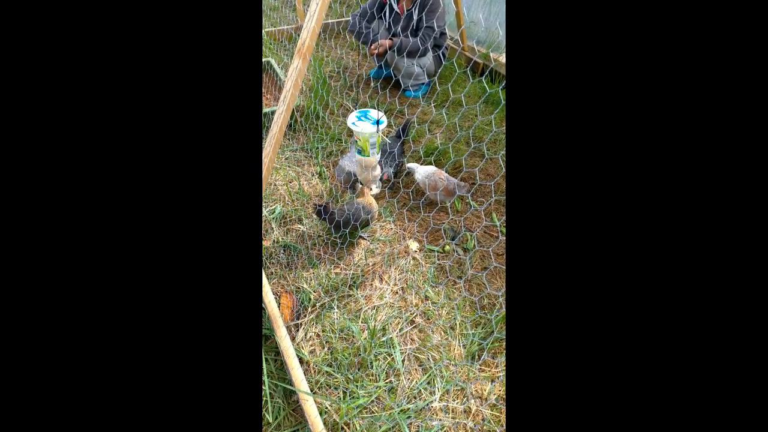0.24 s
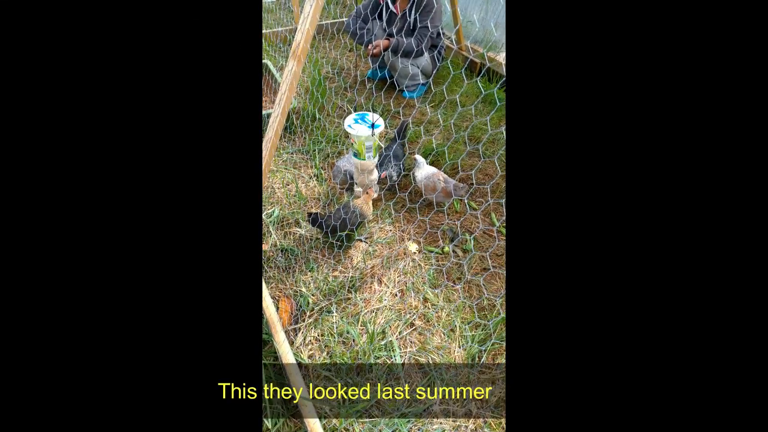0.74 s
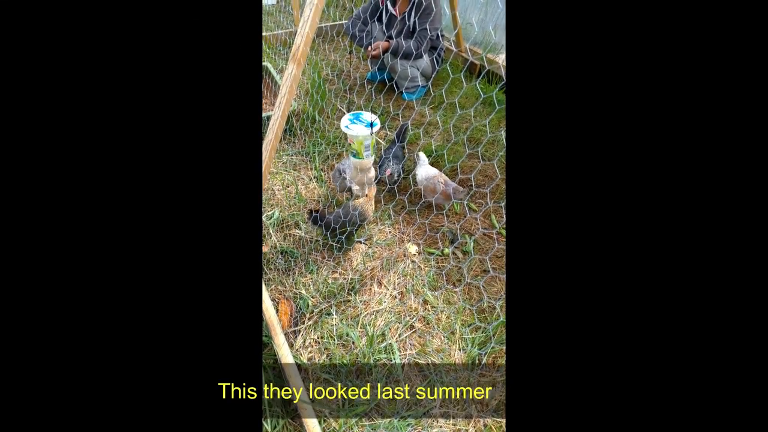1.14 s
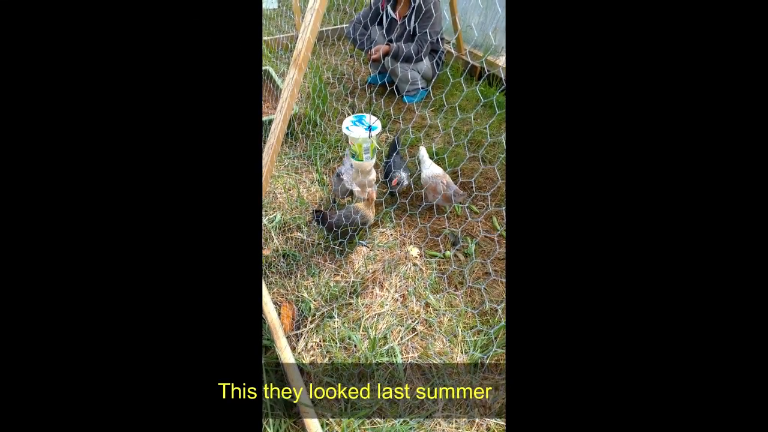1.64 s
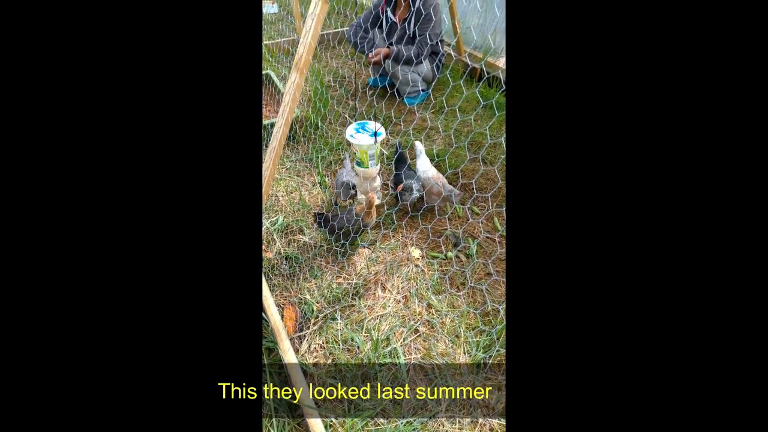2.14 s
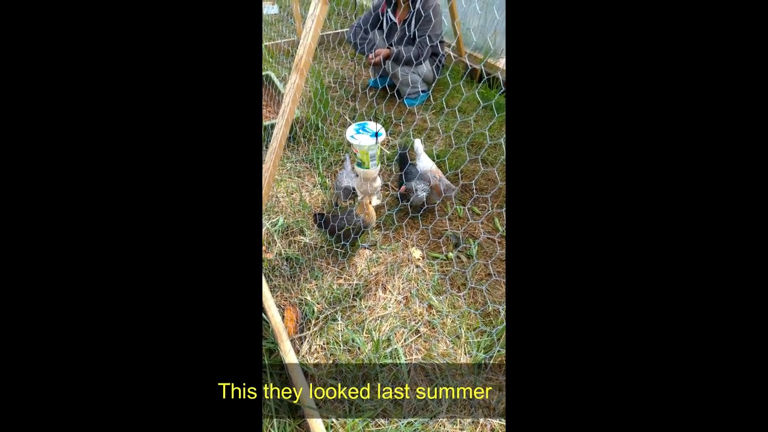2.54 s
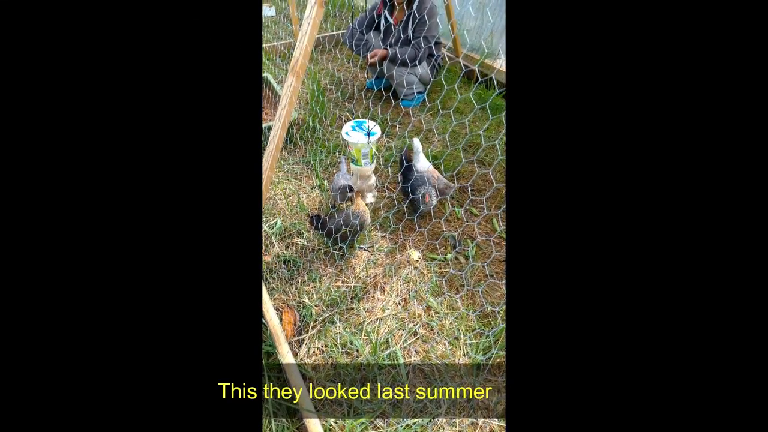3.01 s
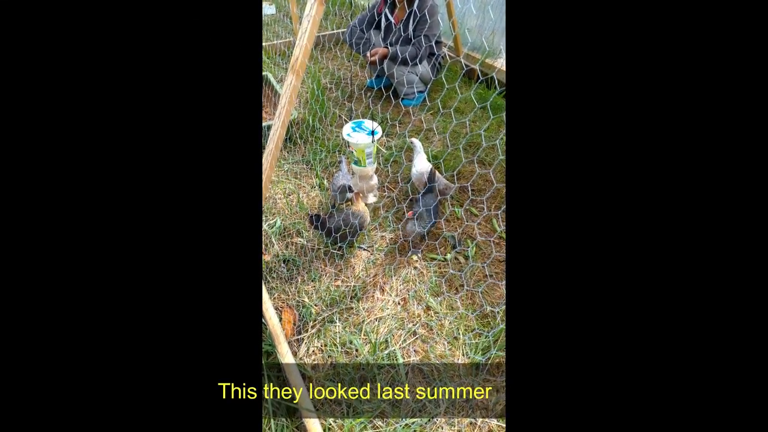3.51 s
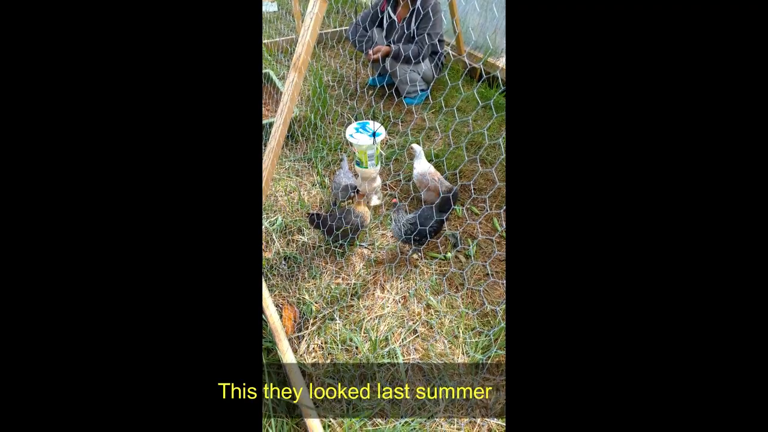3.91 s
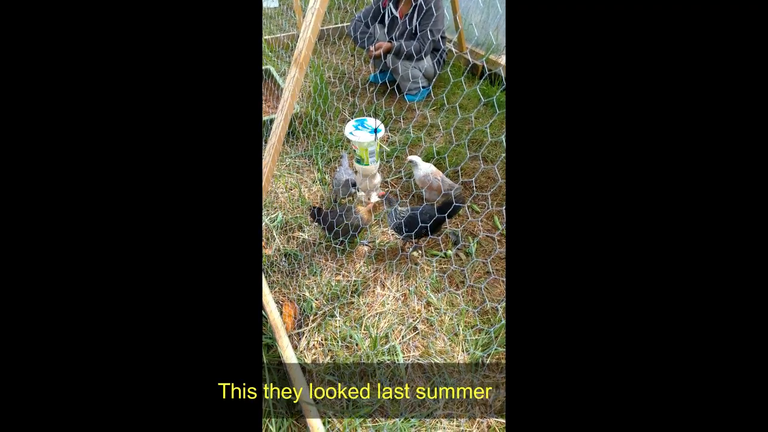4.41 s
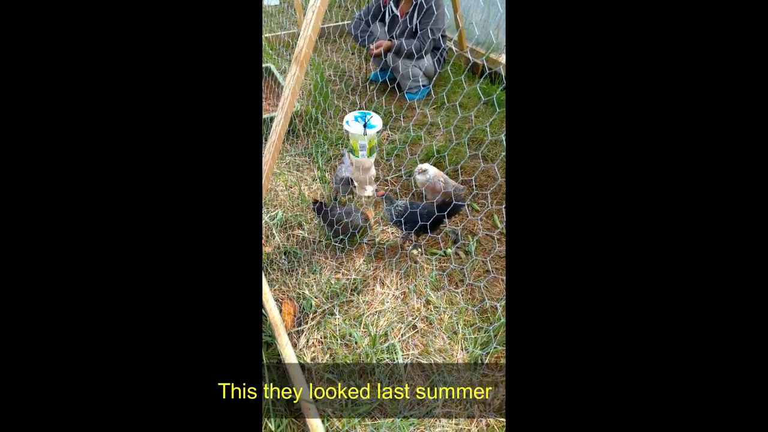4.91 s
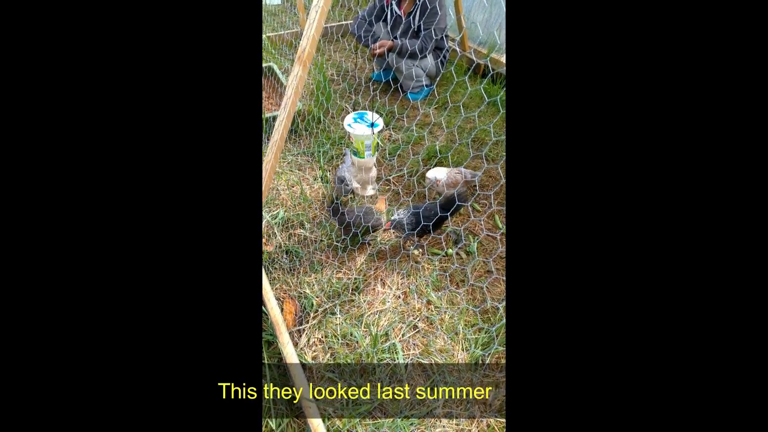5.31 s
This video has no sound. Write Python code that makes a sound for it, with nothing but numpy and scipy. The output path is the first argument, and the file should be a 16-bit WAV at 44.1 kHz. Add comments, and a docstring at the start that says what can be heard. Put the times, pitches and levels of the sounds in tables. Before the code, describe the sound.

Soft short chick chirps close by, faint straw crackles, echoing birdsong, swelling far road noise, and two quick sharp pops in the right channel.

```python
"""Chicks in a wire run by a far road

Young chickens peep softly around a feeder outdoors, near and a little to the right: gliding tones with a
weak octave. Feet and beaks crackle in dry straw (short noise bursts), and a songbird whistles from the trees
through its echoes. Far traffic swells and fades as shaped noise over a low rumble and an even hiss.
Two voltage steps pop in the right microphone channel, and a gain control ducks just after loud peaks."""
import sys
import numpy as np
from scipy import signal
from scipy.fft import rfft, irfft, next_fast_len
from scipy.io import wavfile
from scipy.ndimage import map_coordinates

SR = 44100
rng = np.random.default_rng(int(sys.argv[2]) if len(sys.argv) > 2 else 0)


def unload_audio(sound):
    """Save the sound as a 16-bit wav file, at the path given as the first command line argument."""
    columns = np.transpose(np.atleast_2d(sound))
    # keep every value between -1 and 1, then stretch to whole-number steps
    steps = np.round(np.clip(columns, -1, 1) * 32767)
    wavfile.write(sys.argv[1], SR, steps.astype(np.int16))


N = 244755  # length in samples


def amp(db):
    """Decibels to gain."""
    return 10 ** (np.asarray(db) / 20)


def unit(x):
    """Scale to rms 1."""
    return x / np.sqrt(np.mean(x ** 2) + 1e-20)


def along(points, hz):
    """Read a curve of (Hz, value) points on a log frequency axis."""
    point_hz, values = np.transpose(points)
    return np.interp(np.log(hz + 1), np.log(point_hz + 1), values)


def wobble(rate, size=N):
    """A smooth random curve with rate knots a second."""
    knots = rng.standard_normal(int(size * rate / SR) + 4)
    return map_coordinates(knots, [np.arange(size) * rate / SR])


def filtered(x, response):
    """Multiply the spectrum of x by a response of frequency."""
    m = next_fast_len(N + SR // 2)
    hz = np.fft.rfftfreq(m, 1 / SR)
    return irfft(rfft(x, m) * response(hz), m)[..., :N]


def add(track, start_s, sound):
    """Mix a sound into a track at its start time."""
    part = track[..., max(round(start_s * SR), 0):][..., :sound.shape[-1]]
    part += sound[..., :part.shape[-1]]


def progress(length):
    """Run from 0 to 1 over a length in seconds."""
    return np.linspace(0, 1, int(length * SR))


def swell(size, rise, fall):
    """An envelope that opens and closes over shares of its length."""
    u = np.linspace(0, 1, size)
    return np.sin(np.pi / 2 * np.clip(np.minimum(u / rise, (1 - u) / fall), 0, 1))


# Likeness of the left and right channels in noise. Each row: frequency in Hz, likeness from 0 to 1.
LIKENESS = [(60, 0.9), (200, 0.71), (500, 0.6), (1000, 0.64), (2000, 1), (4000, 0), (10000, 0.036)]


def rush(spectrum):
    """Stereo noise of rms 1; the balance of mid and side sets how alike the channels are at each frequency."""
    def mid_side_response(hz):
        angle = np.arccos(np.clip(along(LIKENESS, hz), -1, 1)) / 2
        # rolls off steeply above twice the last frequency in the table
        skirt = 1 / (1 + (hz / 2 / spectrum[-1][0]) ** 8)
        return skirt * amp(along(spectrum, hz)) * [np.cos(angle), np.sin(angle)]

    mid, side = filtered(rng.standard_normal((2, N)), mid_side_response)
    return unit(np.array([mid + side, mid - side]))


def echoes(x, decay):
    """A diffuse noise tail for each channel; each frequency dies at its own speed."""
    hz, t, z = signal.stft(rng.standard_normal((2, SR)), SR, nperseg=256)
    fading = amp(-60 * t / along(decay, hz)[:, None])
    tail = signal.istft(z * fading, SR, nperseg=256)[1]
    return signal.fftconvolve(x, tail / np.linalg.norm(tail[0]), axes=1)[:, :N]


def peep(hz, db, fade_db, overtone_db, rough, lag, flutter_hz=330, waver=0.0096):
    """One gliding tone with a weak octave; a fast flutter of the syrinx roughens its pitch and level."""
    n = len(hz)
    phase = 2 * np.pi * np.cumsum(hz * (1 + waver * wobble(287, n))) / SR
    flutter_phase = 2 * np.pi * np.cumsum(flutter_hz * (1 + 0.31 * wobble(119.0, n))) / SR
    flutter = rough * np.sin(flutter_phase)
    # the right channel lags in phase
    ears = phase + flutter - np.array([[0], [lag]])
    tone = np.sin(ears) + amp(overtone_db) * np.sin(2 * ears)
    # the push of air weakens through the call
    level_db = db - fade_db * np.linspace(0, 1, n) + 2.9 * wobble(112, n)
    return unit(tone * (1 + flutter)) * amp(level_db) * swell(n, rise=0.26, fall=0.18)


# Arched peeps near the microphones. Each row: start in seconds, length in seconds, crest in Hz,
# opening level in dB before placing, fade in dB, overtone in dB, roughness from 0 to 1, right lag in radians.
ARCHED_PEEPS = [ (0.139, 0.078, 3060, -61.5, 2.5, -8, 0.5, 1.42), (0.33, 0.067, 3020, -60, 4, -7, 0.7, 1.2),
                (2.709, 0.052, 2660, -51.5, 1.5, -22, 0.03, 1.15),
                (4.335, 0.083, 2284, -53.5, 20, -19, .08, -.7),
                (4.819, .053, 2756, -49.5, 4, -16.5, 0, 0.94), (5.06, 0.072, 2420, -60, 5, -20, .45, -0.92),
                (5.463, 0.059, 2810, -50.5, 4, -14.5, .1, -0.98)]


def arched_peeps(crest_s=.025, scoop=.28, sag=.115):
    """The pitch scoops up to a crest and sags after it, by shares of the crest pitch."""
    out = np.zeros((2, N))
    for s, length, crest_hz, db, fade_db, overtone_db, rough, lag in ARCHED_PEEPS:
        t = progress(length) * length - crest_s
        before = scoop * (t / crest_s) ** 2
        after = sag * (t / (length - crest_s)) ** 2
        hz = crest_hz * (1 - np.where(t < 0, before, after))
        add(out, s, peep(hz, db, fade_db, overtone_db, rough, lag))
    return out


# Steeply falling peeps near the microphones. Each row: start in seconds, length in seconds, start in Hz,
# final pitch in Hz, opening level in dB before placing, right lag in radians.
FALLING_PEEPS = [(0.116, 0.044, 4050, 2600, -64.5, 1.5), (1.886, 0.064, 4200, 2750, -57.5, 1.45),
                 (2.112, .045, 4680, 2780, -57.5, 1.1), (2.328, .053, 4200, 2700, -59.5, 0.93),
                 (2.536, 0.062, 4255, 2760, -62.5, -1.1)]


def falling_peeps(span=0.42):
    """The pitch slides down steeply, mostly within a share (span) of the call, and levels out."""
    out = np.zeros((2, N))
    for s, length, start_hz, final_hz, db, lag in FALLING_PEEPS:
        hz = final_hz + (start_hz - final_hz) * np.exp(-(progress(length) / span) ** 2)
        add(out, s, peep(hz, db, fade_db=2.5, overtone_db=-21, rough=0.35, lag=lag))
    return out


# Soft contented peeps near the microphones. Each row: start in seconds, length in seconds, lowest pitch in Hz,
# moment of the lowest pitch from 0 to 1, bend as a share of the pitch,
# opening level in dB before placing, right lag in radians.
DIPPING_PEEPS = [ (1.465, .068, 2200, 0.9, 0.23, -64.5, .6), (1.652, 0.091, 2205, 0.93, 0.26, -64.5, .45),
                 (1.749, .04, 2210, .3, 0.28, -72, .3), (2.514, 0.079, 2454, 0.36, 0.42, -61.5, -0.72),
                 (2.822, 0.054, 2620, .48, 0.61, -58, 0.75), (2.872, .066, 2075, 0.49, 0.37, -57, -0.68),
                 (3.078, 0.052, 2180, 0.88, 0.077, -56, -0.27)]


def dipping_peeps():
    """The pitch sags and lifts again; higher dips are pressed harder and have a stronger octave."""
    out = np.zeros((2, N))
    for s, length, low_hz, turn, bend, db, lag in DIPPING_PEEPS:
        hz = low_hz * (1 + bend * (progress(length) - turn) ** 2)
        overtone_db = -21.5 + .02 * (low_hz - 2530)  # .02 dB per Hz
        add(out, s, peep(hz, db, fade_db=2.5, overtone_db=overtone_db, rough=0.24, lag=lag))
    return out


# Harmonics of a broken peep, from the first to the fourth, each a relative level in dB.
BROKEN_PARTIALS_DB = [2, 1.5, -8.5, -23]
# Peeps that break low. Each row: start in seconds, length in seconds, start in Hz, end in Hz,
# level in dB before placing.
BROKEN_PEEPS = [(0.144, 0.013, 1380, 1290, -64), (1.922, .020, 1423, 1262, -50)]


def broken_peeps():
    """The syrinx drops into its lower register: a short squeak rich in harmonics."""
    out = np.zeros((2, N))
    for s, length, start_hz, end_hz, db in BROKEN_PEEPS:
        n = int(length * SR)
        phase = 2 * np.pi * np.cumsum(np.linspace(start_hz, end_hz, n)) / SR
        tone = sum(amp(level) * np.sin((k + 1) * phase) for k, level in enumerate(BROKEN_PARTIALS_DB))
        add(out, s, amp(db) * unit(tone * swell(n, rise=0.81, fall=0.21)))
    return out


# Decay of the echoes in the run. Each row: frequency in Hz, time to fall by 60 dB in seconds.
YARD_DECAY = [(500, 0.33), (3000, 0.17), (10000, 0.92)]


def chicks():
    """Near chicks, a little to the right, with a faint diffuse echo of the yard."""
    peeps = arched_peeps() + falling_peeps() + dipping_peeps() + broken_peeps()
    placed = peeps * amp([[-1.5], [.8]])
    return placed + amp(-11.0) * echoes(placed, YARD_DECAY)


# Feet and beaks in the straw. Each row: start in seconds, length in seconds,
# level in dB before the envelope and crackle.
STRAW_STROKES = [(0.026, 0.043, -71), (0.496, 0.022, -71), (0.655, 0.074, -69.5), (1.461, .02, -65),
                 (4.78, .04, -71), (4.911, 0.011, -63.5)]
# Colour of the straw. Each row: frequency in Hz, relative density in dB per Hz.
STRAW_COLOUR = [(800, -25), (2500, 0), (5500, -2), (8000, -14), (15000, -23)]


def straw():
    """Dry stalks crackle briefly under feet and beaks: noise with a fast uneven level."""
    strokes = np.zeros(N)
    for s, length, db in STRAW_STROKES:
        add(strokes, s, amp(db) * swell(int(length * SR), rise=0.6, fall=0.62))
    crackle = unit(rush(STRAW_COLOUR) * amp(2.9 * wobble(500)))
    return strokes * crackle


# Steps in the right microphone channel. Each row: start in seconds, step in dB before the low cut.
POP_STEPS = [(3.6112, -12.5), (3.6538, -0.5)]
# Low cut of the input, in stages. Each row: frequency in Hz, width in Hz.
LOW_CUT = [(53.7, 18.4), (89.9, 116)]


def pops(rise_s=0.00012):
    """A voltage step in the right channel; the low cut turns it into a spike and a short bass ring."""
    t = np.arange(N) / SR
    volts = sum(amp(db) * np.clip((t - s) / rise_s, 0, 1) for s, db in POP_STEPS)
    for hz, width in LOW_CUT:
        resonance = [1, 2 * np.pi * width, (2 * np.pi * hz) ** 2]
        b, a = signal.bilinear([1, 0, 0], resonance, SR)
        volts = signal.lfilter(b, a, volts)
    return np.array([np.zeros(N), volts])


def whistle(length, start_hz, end_hz, waver_hz):
    """A straight glide of rms 1 with a fast random waver of pitch, as in notes blurred by echoes."""
    n = int(length * SR)
    hz = np.linspace(start_hz, end_hz, n) + waver_hz * wobble(309.5, n)
    return unit(np.sin(2 * np.pi * np.cumsum(hz) / SR) * swell(n, rise=0.11, fall=0.69))


# The songbird's phrase. Each row: start in seconds, length in seconds, start in Hz, end in Hz,
# level in dB before the mix of direct sound and echo, waver depth in Hz.
SONG_PHRASE = [ (0, 0.016, 2880, 2600, -61, 12), (0, 0.041, 3390, 3445, -65.5, 29),
               (0.378, 0.11, 2510, 2470, -68.5, 60), (0.485, .09, 2695, 3385, -63, 10),
               (0.567, 0.051, 3350, 3160, -67.5, 36), (0.766, 0.17, 3540, 3190, -64.5, 123),
               (0.86, .16, 3028, 2978, -61.5, 11), (1.109, 0.042, 4340, 4110, -63, 185),
               (1.275, .05, 5160, 5120, -68, 200), (1.325, 0.27, 3695, 3705, -65, 2),
               (1.495, .1, 2654, 2704, -62, 7.6), (1.661, 0.069, 3320, 3090, -66, 123)]
# Thin high slurs of another bird. Each row: start in seconds, start in Hz, level in dB before the same mix.
HIGH_SLURS = [(2.18, 7400, -80), (2.94, 7400, -83), (3.1, 7160, -80), (3.45, 7330, -76), (4.26, 6700, -86),
              (4.43, 6380, -81), (5.21, 7700, -79)]
# Decay of the echoes among the trees. Each row: frequency in Hz, time to fall by 60 dB in seconds.
TREE_DECAY = [(500, 0.65), (3000, 1), (5000, 0.8), (7000, 0.38)]


def songbirds(slur_s=.1, slur_fall_hz_per_s=6000):
    """A whistled phrase and another bird's falling slurs, heard largely through echoes among the trees."""
    out = np.zeros((2, N))
    for s, length, start_hz, end_hz, db, waver_hz in SONG_PHRASE:
        add(out, s, amp(db) * whistle(length, start_hz, end_hz, waver_hz))
    for s, start_hz, db in HIGH_SLURS:
        end_hz = start_hz - slur_fall_hz_per_s * slur_s
        add(out, s, amp(db) * whistle(slur_s, start_hz, end_hz, waver_hz=30))
    return amp(-10.0) * out + amp(-8.0) * echoes(out, TREE_DECAY)


# Brief surges of the tyre roar. Each row: crest in seconds, half-length in seconds, centre in Hz,
# crest level in dB before placing.
ROAR_SURGES = [(3.18, 0.027, 910, -56), (3.335, 0.13, 750, -50.5), (3.547, 0.16, 813, -46),
               (3.857, 0.13, 830, -50.5), (4.891, 0.14, 1085, -53.5), (5.44, 0.18, 1070, -55.5)]
# Colour of a surge. Each row: multiple of the centre frequency, relative density in dB per Hz.
SURGE_SHAPE = [(.55, -13.5), (.76, 1), (1, 1.5), (1.17, -5), (1.45, -10.5), (2.2, -30), (5, -41)]


def surges():
    """The roar swells for a moment, each time around its own pitch."""
    t = np.arange(N) / SR
    out = np.zeros((2, N))
    for crest_s, half_s, centre_hz, db in ROAR_SURGES:
        bump = np.exp(-((t - crest_s) / half_s) ** 2)
        out += amp(db) * bump * rush(np.array(SURGE_SHAPE) * [centre_hz, 1])
    return out


def from_left(x, lead_s):
    """Sound reaches the left microphone port first: split the lead between the two channels."""
    sides = np.array([[1], [-1]])
    return filtered(x, lambda hz: np.exp(1j * np.pi * hz * lead_s * sides))


# The far road, in two stretches. Each row: time in seconds, road level in dB that drives the layers.
ROAD_LEVEL = [
    [(0.1, -64.5), (0.29, -64), (1.42, -62), (1.99, -56.5), (3.1, -57)],
    [(4.1, -56.5), (4.434, -59), (4.862, -59), (5.326, -61), (5.55, -63.5)],
]
# Colours of the engines and of the low and high tyre roar.
# Each row: frequency in Hz, relative density in dB per Hz.
ENGINE_COLOUR = [(60, -32), (105, 2), (155, -6.5), (192, 0.5), (230, -6.5), (300, -7), (400, -6.5),
                 (600, -10)]
LOW_ROAR_COLOUR = [(300, -25), (460, -9.5), (590, 0), (690, -0.5), (780, -1.5), (1000, -7), (1400, -29)]
HIGH_ROAR_COLOUR = [(600, -31), (800, -14.5), (950, 0.5), (1130, 2), (1450, -5.5), (2000, -12.5),
                    (3000, -45), (6000, -43)]


def traffic(low_lead_s=0.00013, high_lead_s=0.00032, usual_db=-61):
    """Far engines and tyres swell together; each layer gains its own share of the road's swell."""
    s, road_db = np.vstack(ROAD_LEVEL).T
    swell_db = np.interp(np.arange(N) / SR, s, road_db) - usual_db
    # level in dB at the usual road level, plus dB gained per dB of the road
    engine_db = -68.5 + .8 * swell_db
    low_db = -61 + 0.65 * swell_db + 1.24 * wobble(12)
    high_db = -58.5 + .5 * swell_db + 2.0 * wobble(13)
    low = amp(engine_db) * rush(ENGINE_COLOUR) + amp(low_db) * rush(LOW_ROAR_COLOUR)
    high = amp(high_db) * rush(HIGH_ROAR_COLOUR)
    road = from_left(low + surges(), low_lead_s) + from_left(high, high_lead_s)
    return road * amp([[-.6], [.6]])


# Colours of the low rumble and the even hiss. Each row: frequency in Hz, relative density in dB per Hz.
RUMBLE_COLOUR = [(20, -22), (40, -16), (62, 4), (85, -6.5), (140, -14.5), (400, -55)]
HISS_COLOUR = [(300, 2), (1500, 9), (2500, 4.5), (4000, 1.5), (6000, -3.5), (8000, -7), (12000, -5.5),
               (15500, -10)]


def rumble_and_hiss():
    """A steady floor of two shaped noises under everything."""
    return amp(-66.5) * rush(RUMBLE_COLOUR) + amp(-69.5) * rush(HISS_COLOUR)


def scene():
    """Near chicks, straw and pops before the birds, the far road and the noise floor."""
    return chicks() + straw() + pops() + songbirds() + traffic() + rumble_and_hiss()


def record(dry, limit_db=-10, release_s=0.022, lag_s=0.033, top_hz=15750):
    """Gain control ducks just after a loud peak and recovers; nothing passes above the band limit."""
    t = np.arange(N) / SR
    peak_db = 20 * np.log10(np.abs(dry).max(0) + 1e-9)
    excess_db = np.maximum(peak_db - limit_db, 0)
    # hold each excess while it decays
    held_db = np.maximum.accumulate(excess_db * np.exp(t / release_s)) * np.exp(-t / release_s)
    lag = np.exp(-1 / (lag_s * SR))
    duck_db = signal.lfilter([1 - lag], [1, -lag], held_db)
    return filtered(dry * amp(-duck_db), lambda hz: hz < top_hz)


dry = scene()
out = record(dry)
unload_audio(out)
```